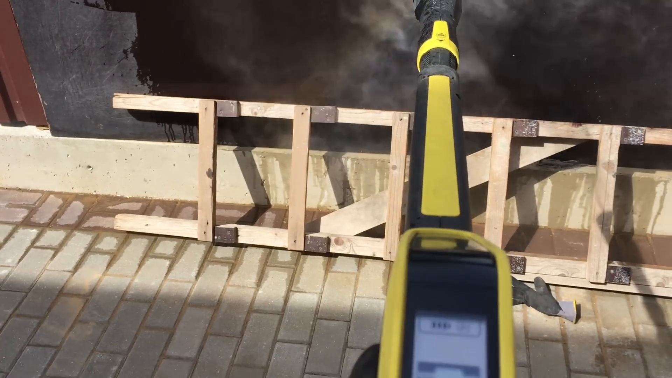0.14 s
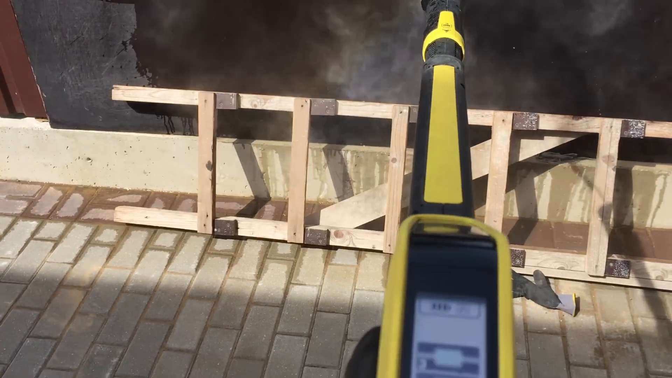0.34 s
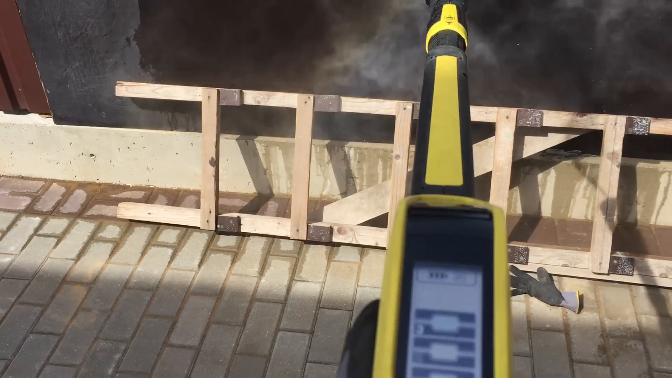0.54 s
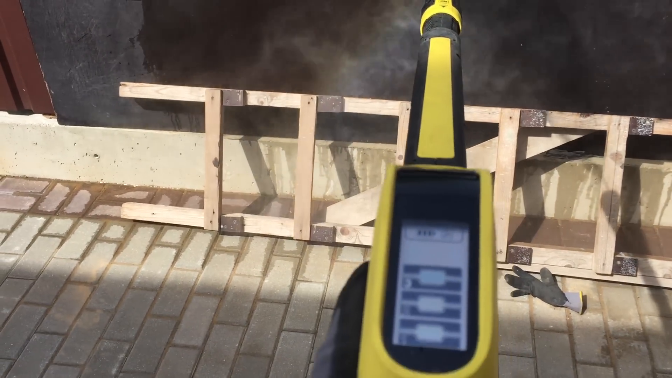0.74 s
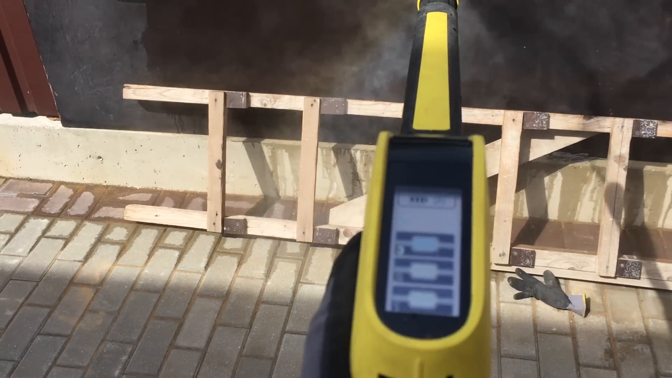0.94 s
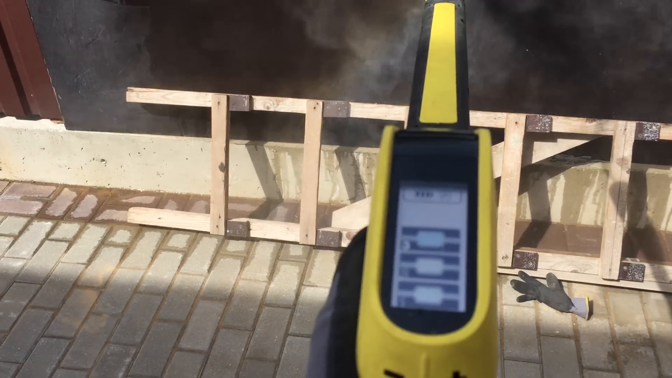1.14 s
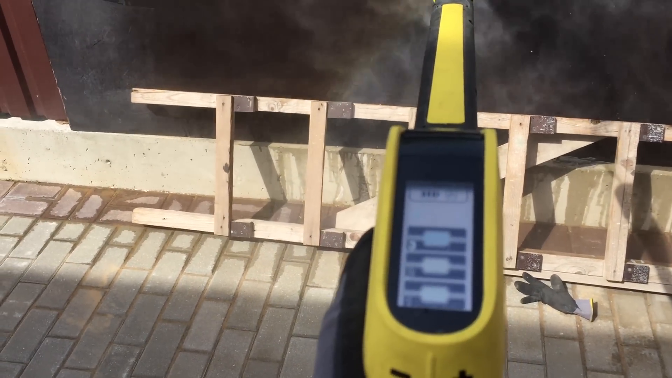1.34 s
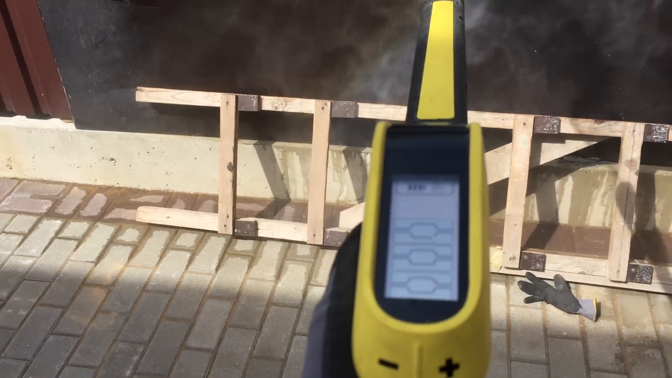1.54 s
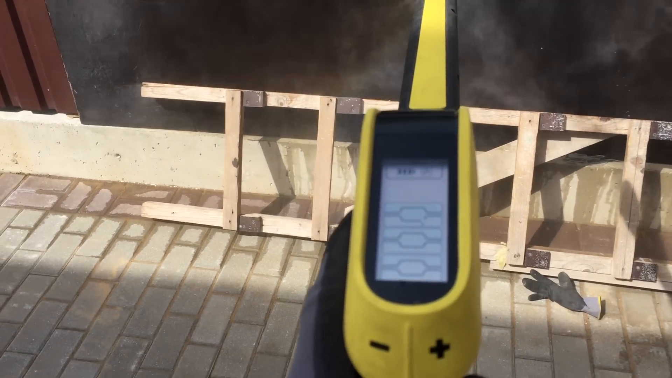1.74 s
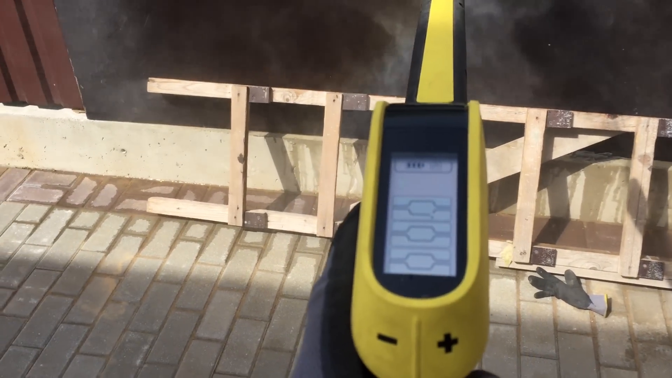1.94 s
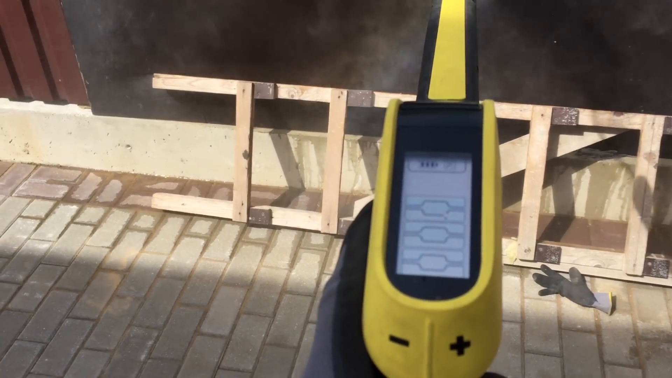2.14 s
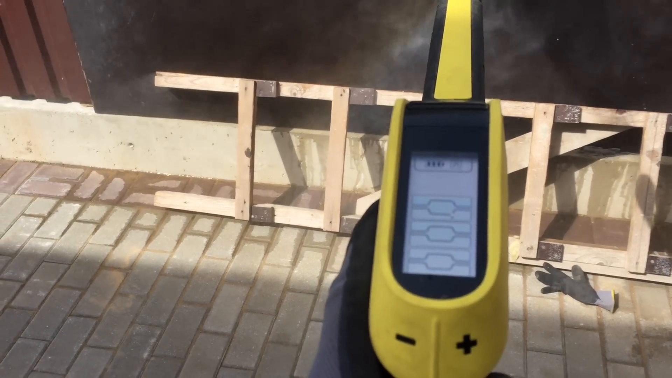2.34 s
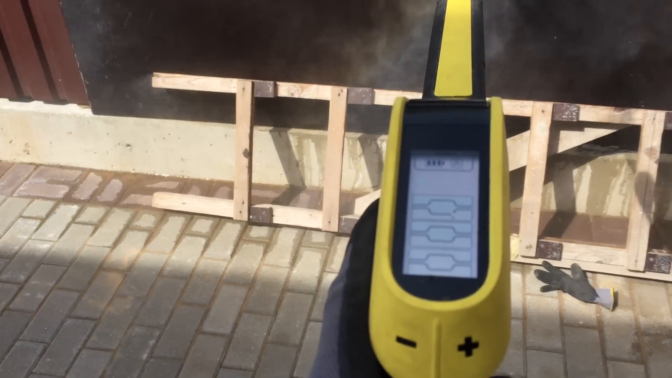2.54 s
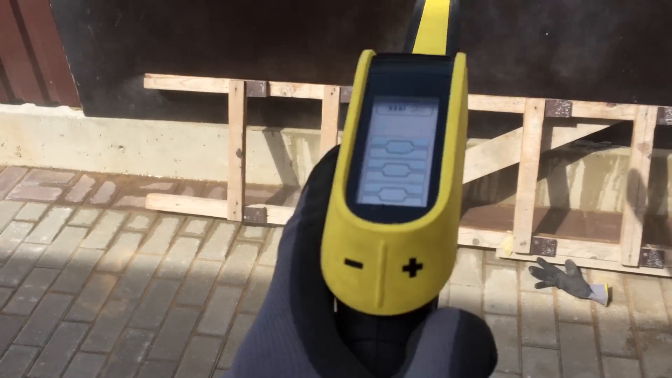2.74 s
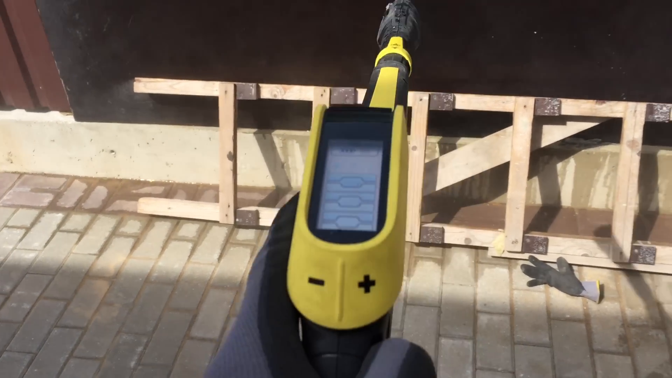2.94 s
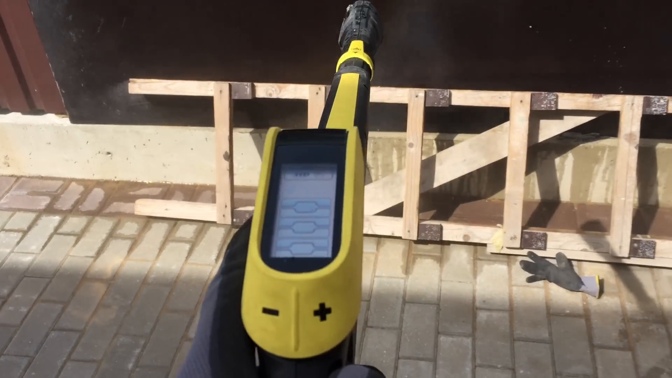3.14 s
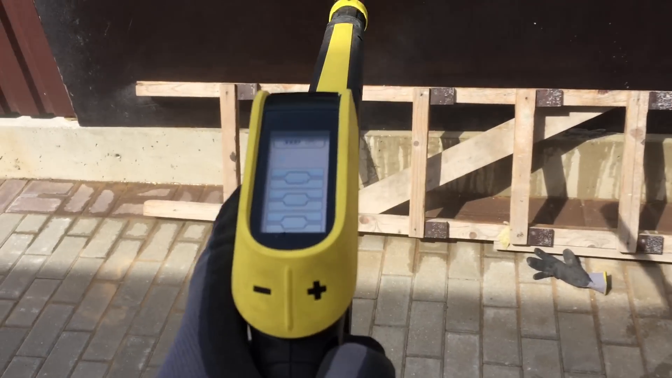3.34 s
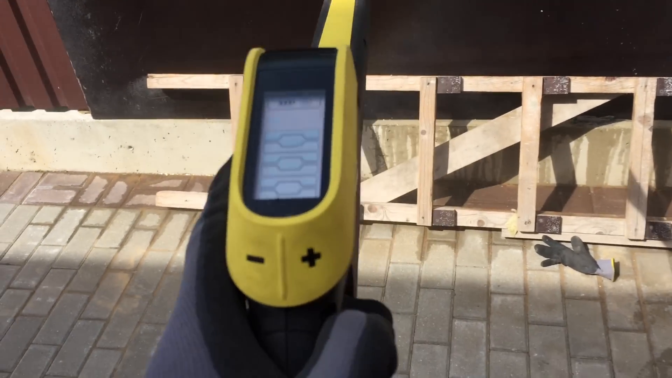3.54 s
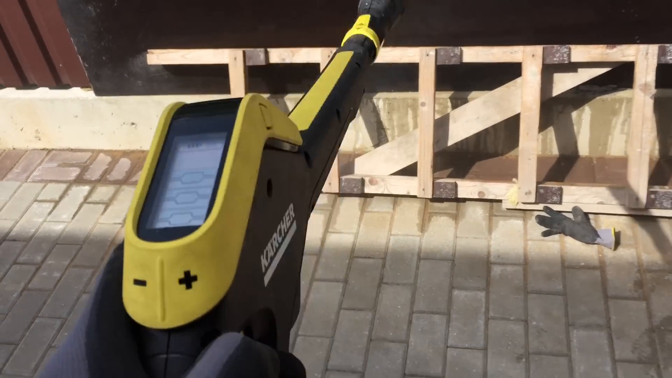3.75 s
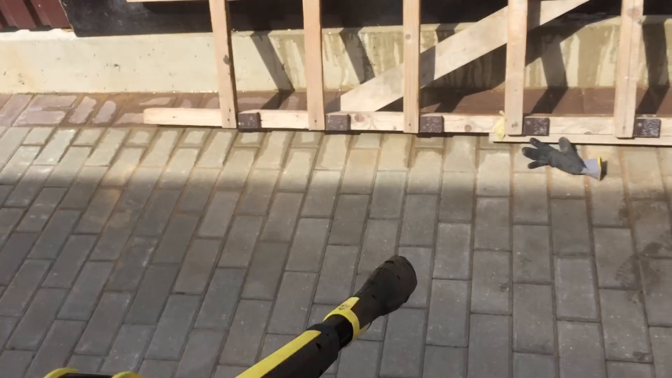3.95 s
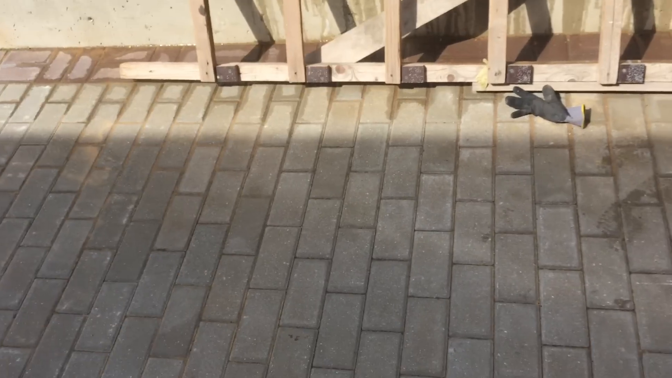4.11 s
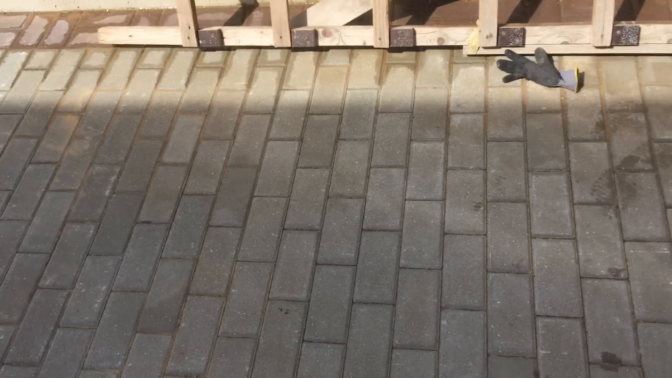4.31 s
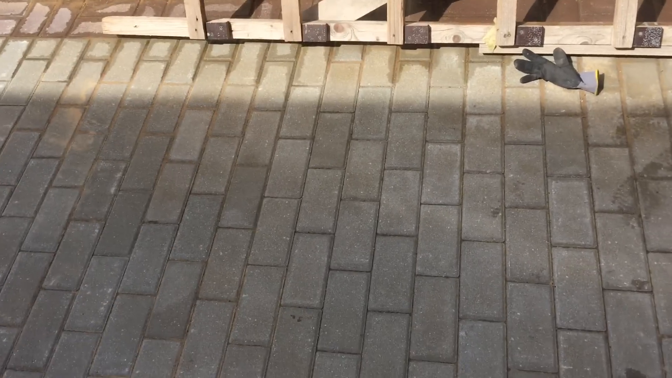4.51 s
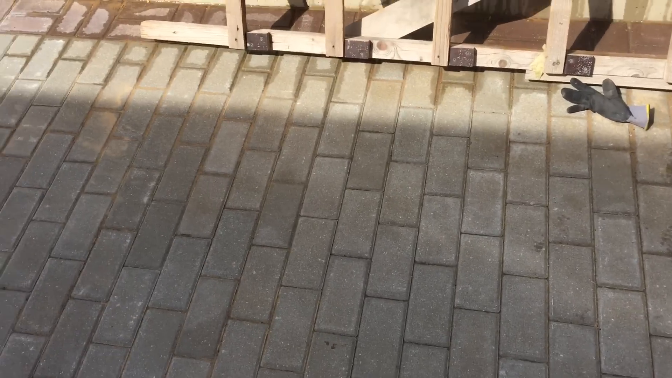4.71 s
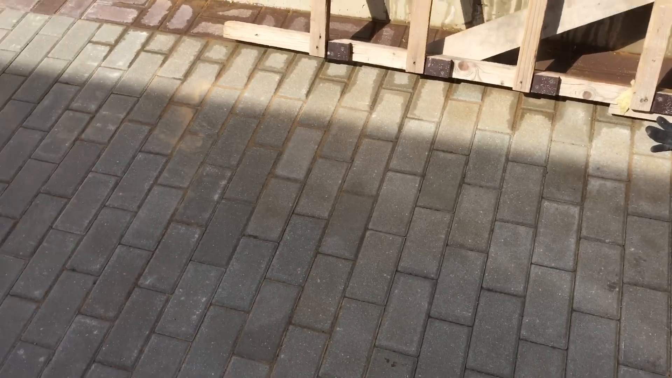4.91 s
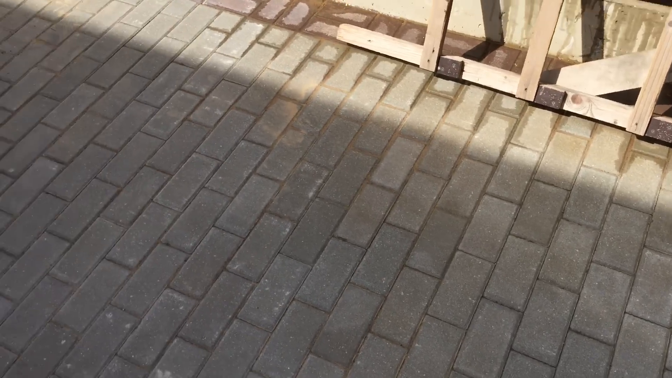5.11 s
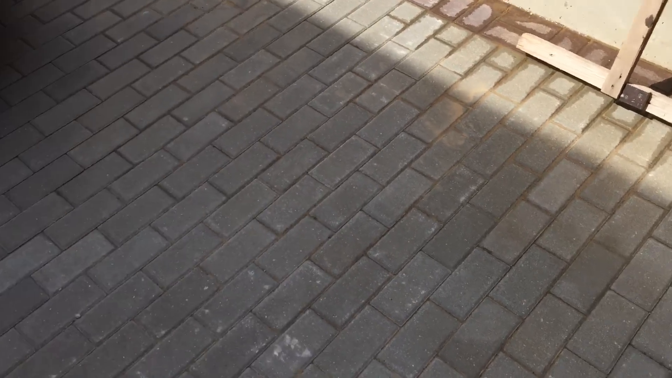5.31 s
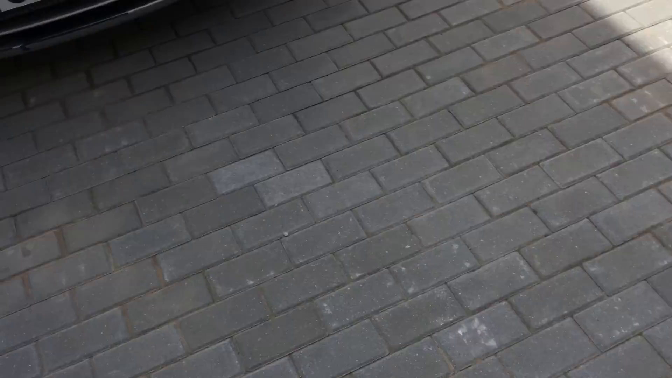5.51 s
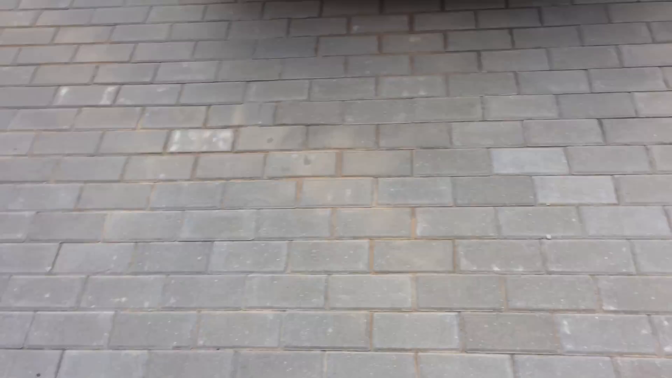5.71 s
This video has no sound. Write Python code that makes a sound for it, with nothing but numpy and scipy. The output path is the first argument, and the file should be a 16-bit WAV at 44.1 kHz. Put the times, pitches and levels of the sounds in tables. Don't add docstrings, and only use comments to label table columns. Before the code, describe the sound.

From 0 to 2.8 s a pressure washer runs close by: a dense, bright, steady jet hiss with water splashing on a wall, a mid-pitched pump whine, low rumble and a hose throb that quickly builds and rises slightly. The jet starts a little weak and soon settles. At 2.8 s the trigger snaps shut with a very loud, hard plastic click and short yard echo; the pump stops within about a tenth of a second. Remaining pressure dribbles and sighs through the hollow lance, thinning out by 3.5 s. Then the yard is very quiet, with faint air and muffled low handling bumps on the camera. Light ticks and taps occur around 3.4 to 4.2 s, soft shoe scuffs, sleeve swishes and hose scraping from 4.1 to 4.9 s. A harder lance knock with tiny bounces lands at 5.2 s, faint taps follow at 5.5 s, and a short, quickly weakening spray burst begins at 5.7 s.

```python
import sys
import numpy as np
from scipy import signal
from scipy.fft import rfft, irfft, next_fast_len
from scipy.io import wavfile
from scipy.ndimage import uniform_filter1d, map_coordinates

SR = 44100
rng = np.random.default_rng(int(sys.argv[2]) if len(sys.argv) > 2 else 0)


def boost(x):
    u = np.asarray(x, float) / 20
    return 10 ** u


def persist_wave(psi):
    counts = np.round(np.clip(psi, -1, 1) * 32767).astype(np.int16)
    wavfile.write(sys.argv[1], SR, np.atleast_2d(counts).T)


N = 254456

SHUT_S, STOP_S, EMPTY_S, AGAIN_S = 2.813, 2.914, 3.415, 5.7


def unit(x):
    return x / np.sqrt(np.mean(x ** 2) + 1e-20)


def along(points, hz):
    f, v = np.transpose(points)
    return np.interp(np.log(hz + 1), np.log(f + 1), v)


def wobble(rate):
    knots = rng.standard_normal(int(N * rate / SR) + 4)
    return map_coordinates(knots, [np.arange(N) * rate / SR])


def filtered(x, response):
    m = next_fast_len(N + 8192)
    return irfft(rfft(x, m) * response(np.fft.rfftfreq(m, 1 / SR)), m)[:N]


def rush(spectrum, patchy_db, grain_db, comb_db=1.68):
    grains = rng.standard_normal(N) * boost(grain_db * wobble(1500))
    z = signal.stft(grains, nperseg=1024)[2]
    patches = uniform_filter1d(rng.standard_normal(z.shape), 4, 0)
    patches = unit(uniform_filter1d(patches, 10, 1))
    comb = rng.standard_normal(len(z))[:, None]
    x = signal.istft(z * boost(patchy_db * patches + comb_db * comb), nperseg=1024)[1][:N]
    return unit(filtered(x, lambda hz: boost(along(spectrum, hz))))


def resonant(modes):
    def shape(f):
        return sum(boost(db) * (f * w) ** 2 / ((c * c - f * f) ** 2 + (f * w) ** 2) for c, w, db in modes)
    return unit(filtered(rng.standard_normal(N), shape))


def since(s):
    return np.maximum(np.arange(N) / SR - s, 0)


def ends(s, t60):
    return boost(-60 * since(s) / t60)


def trickle(db, db_per_s):
    return (since(SHUT_S) > 0) * boost(db + db_per_s * since(SHUT_S)) * ends(EMPTY_S, 0.28)


def shut_fade():
    return np.clip(since(SHUT_S) / 0.053, 0, 1)


def coasting():
    return shut_fade() * ends(STOP_S, 0.11)


def dryness():
    return np.clip(since(2.88) / 0.36, 0, 1)


def flow_level():
    return -2.5 * np.exp(-since(0) / 0.25) + 0.26 * wobble(9)


def shaft_turns():
    order_13_hz = 611.2 + 13.05 * np.exp(-since(0) / 0.3285)
    order_13_hz = order_13_hz - 16 * (1 - np.exp(-since(SHUT_S) / 0.04))
    return 2 * np.pi * np.cumsum(order_13_hz / 13) / SR


# multiple of the shaft speed, level/dB against the 13th, phase wander/rad
PUMP_ORDERS = [(3.01, -15, 0.39), (4.014, -12, .9), (4.98, -12, 1), (6.008, -3.5, 0.75),
               (10.97, -22.5, 0.64), (12.01, -16.5, .3), (12.94, 1, 0.11), (17.07, -19, .4),
               (20.16, -20, 1), (24, -21, 0.19), (29.45, -22, .8)]


def pump_whine(shaft):
    level_db = -28 - 3 * np.exp(-since(0) / 0.074) - 105 * since(SHUT_S)
    orders = sum(boost(db + 0.25 * wobble(14)) * np.sin(multiple * shaft + wander * wobble(15))
                 for multiple, db, wander in PUMP_ORDERS)
    mains_hum = boost(-16 + 2.5 * wobble(23)) * np.sin(2 * np.pi * 100.5 * since(0))
    return np.sqrt(2) * boost(level_db) * ends(STOP_S, 0.11) * (orders + mains_hum)


def hose_throb(shaft):
    t = since(0)
    throb = 2 * np.pi * np.cumsum(58 + 19 * (1 - np.exp(-t / 0.65))) / SR
    slack_db = -27.5 * np.exp(-t / 0.12)
    level = boost(-33.5 + 1.1 * t + slack_db + 0.4 * wobble(4.8)) * ends(SHUT_S, 0.08)
    plain = np.sin(throb + 0.2 * wobble(11))
    with_shaft = boost(-4 + 0.9 * wobble(3.3)) * np.sin(throb + shaft + 0.66 * wobble(11))
    return np.sqrt(2) * level * (plain + with_shaft)


# f/Hz, level/dB per Hz
HISS_COLOUR = [(1760, -23), (3000, -10), (3970, -6.5), (4970, -4.5), (5710, 0), (7720, -3.5), (9010, -1.5),
               (10500, -7), (11300, -4.5), (14200, -5), (15100, -4), (16000, -14)]


def jet_hiss(flow_db):
    jet = rush(HISS_COLOUR, patchy_db=0.45, grain_db=1.0)
    thin = rush(HISS_COLOUR, patchy_db=3.5, grain_db=1.0)
    dull = filtered(thin, lambda hz: 1 / (1 + (hz / 12500) ** 4))
    thin = dull + np.exp(-since(SHUT_S) / 0.4) * (thin - dull)
    mist = boost(-12.5) * shut_fade() * ends(SHUT_S, 0.39)
    return boost(-27 + flow_db) * (ends(SHUT_S, 0.11) + mist) * jet + trickle(-48.5, -15.5) * thin


# f/Hz, level/dB per Hz
SPLASH_COLOUR = [(220, -46.5), (380, -12), (456, -21.5), (548, -15), (604, -11.5), (673, -10),
                 (1310, -12.5), (1530, -10.5), (3990, -15.5), (5000, -23), (6500, -49), (11000, -120)]
# f/Hz, level/dB per Hz
DRIBBLE_COLOUR = [(260, -38.5), (450, -11.5), (603, -6), (832, -15.5), (1420, -11.5), (1570, -17),
                  (2700, -16), (5000, -27.5), (6500, -60), (11000, -120)]


def splash(flow_db):
    shut = shut_fade()
    water = (1 - shut) * rush(SPLASH_COLOUR, patchy_db=0.45, grain_db=1.0)
    water = water + shut * rush(DRIBBLE_COLOUR, patchy_db=1.5, grain_db=0.5)
    level = boost(-25 + 1.2 * flow_db) * ends(SHUT_S, 0.14)
    level = level + boost(-38) * coasting() + trickle(-38, -39.5)
    return level * water


# f/Hz, level/dB per Hz
RUMBLE_COLOUR = [(35, -29.5), (60, -12), (92, -5.5), (166, -4.5), (233, -2.5), (281, -2), (302, -5.5),
                 (330, -3.5), (454, -18), (500, -13), (650, -37), (1100, -120)]
# f/Hz, level/dB per Hz
COAST_COLOUR = [(26, -41), (45, -9.5), (102, -3.5), (151, -14.5), (194, 5), (242, -9.5), (282, 0.5),
                (344, -22), (401, -8.5), (500, -14.5), (650, -40.5), (1100, -120)]


def rumble(flow_db):
    shut = shut_fade()
    shake = (1 - shut) * rush(RUMBLE_COLOUR, patchy_db=2.5, grain_db=2.8)
    shake = shake + shut * rush(COAST_COLOUR, patchy_db=-2.5, grain_db=5.0)
    level = boost(-30 + 1.8 * flow_db) * (1 - shut)
    level = level + boost(-31.5) * coasting() + trickle(-33, -61.5)
    return boost(0.53 * wobble(25)) * level * shake


# f/Hz, level/dB per Hz
YARD_COLOUR = [(60, -42), (150, -19), (280, -21), (460, -27.5), (800, -25.5), (1400, -30.5), (2200, -31),
               (4000, -36.5), (9000, -43), (13000, -46.5), (16000, -45.5)]


def yard_air():
    return boost(-69 + 0.8 * wobble(2.6)) * rush(YARD_COLOUR, patchy_db=2.0, grain_db=0.5)


# centre t/s, peak level/dB, f/Hz, length/cycles
HAND_BUMPS = [(.015, -32, 58, 3), (3.302, -46, 90, 2.2), (3.398, -36.8, 70.3, 3), (3.462, -35, 201, 4),
              (3.527, -44, 59, 3.5), (3.562, -38.5, 97, 4.06), (3.592, -40, 62, 4.14),
              (3.731, -40.2, 112, 3.8), (3.778, -44.5, 77, 3.5), (3.822, -38.5, 80, 3.9),
              (3.899, -44, 92, 5), (3.959, -47.5, 89.5, 3.1), (4.166, -35, 95, 1.6),
              (4.192, -37.5, 108.6, 5), (4.23, -36.5, 81, 4.5), (4.396, -48.8, 72, 2.5),
              (4.485, -44, 85, 4), (4.519, -46, 64.4, 2.8), (4.591, -46, 137, 1.35),
              (4.645, -43.5, 66, 6.1), (4.684, -42, 61, 3.3), (4.742, -37, 72.4, 5), (4.873, -41, 58, 3.9),
              (4.924, -45, 81, 2.3), (5.057, -38, 61, 3), (5.182, -32, 125, 2.9), (5.267, -40, 106, 2.4),
              (5.315, -38, 82, 2.4), (5.344, -36.5, 78.3, 5.2), (5.496, -48.5, 82, 4.4)]


def camera_bumps():
    out = np.zeros(N + 2 * SR)
    for (s, db, hz, cycles), start in zip(HAND_BUMPS, rng.random(len(HAND_BUMPS))):
        t = np.arange(int(SR * cycles / hz)) / SR
        turns = hz * t + start
        shake = np.sin(2 * np.pi * turns)
        shake = shake + 0.14 * np.sin(2 * np.pi * 2.11 * turns)
        first = SR + round(s * SR - len(t) / 2)
        out[first:][:len(t)] += boost(db) * shake * np.hanning(len(t))
    return out[SR:][:N]


# t/s, peak level/dB, f/Hz, t60/s
TRIGGER_RINGS = [
    (2.8012, -8, 1700, .016),
    (2.8046, -0.5, 1400, .02),
    (2.8048, -9, 4500, .016),
    (2.8076, -5, 1300, .012),
    (2.8048, -14, 463, .025),
    (2.8216, -12, 1400, .014),
]


def trigger_snap():
    out, t = np.zeros(N + SR), np.arange(SR // 4) / SR
    rise = 1 - np.exp(-t / 0.0003)
    for s, db, hz, t60 in TRIGGER_RINGS:
        out[round(s * SR):][:len(t)] += boost(db - 60 * t / t60) * rise * np.sin(2 * np.pi * hz * t)
    return out[:N]


# f/Hz, t60/s
WALL_DECAY = [(200, 0.38), (2000, .25), (12000, 0.37)]


def walls(x):
    hz, t, z = signal.stft(rng.standard_normal(SR // 3), SR, nperseg=256)
    decay = boost(-60 * t / along(WALL_DECAY, hz)[:, None])
    tail = signal.istft(z * decay, SR, nperseg=256)[1]
    return signal.fftconvolve(np.pad(x, (200, 0)), tail / np.linalg.norm(tail))[:N]


def puffs(rows):
    out, t = np.zeros(N + SR), np.arange(SR // 4) / SR
    for s, db, hz, sharp, t60 in rows:
        band = signal.iirpeak(hz, sharp, SR)
        once = signal.lfilter(*band, rng.standard_normal(len(t)))
        puff = unit(signal.lfilter(*band, once))
        rise = 1 - np.exp(-t * hz / 0.51)
        out[round(s * SR):][:len(t)] += boost(db - 60 * t / t60) * rise * puff
    return out[:N]


# t/s, peak level/dB, f/Hz
GRIT_TICKS = [(2.8064, -12.5, 6010), (3.7225, -53, 1000), (3.974, -58, 3810), (4.038, -66, 6450),
              (4.062, -61, 3500), (4.191, -46, 4480), (4.44, -45, 3500), (4.661, -53, 10640),
              (4.958, -67, 13530), (5.45, -69, 8000), (5.458, -67, 7200)]


def ticks():
    return puffs([(*row, 1.2, 0.014) for row in GRIT_TICKS])


# t/s, level/dB
GRIP_LEVEL = [(2.93, -53), (3.05, -54), (3.2, -73), (3.62, -57), (3.85, -53), (4.1, -61.5), (4.7, -60.5),
              (5.2, -50), (5.56, -68)]


def grip_tremor():
    s, db = np.transpose(GRIP_LEVEL)
    level_db = np.interp(np.arange(N) / SR, s, db) - 6 + 5.5 * wobble(15)
    return (since(SHUT_S) > 0) * boost(level_db) * resonant([(69.6, 74, 8.5), (150, 82, -13.0)])


# f/Hz, width/Hz, level/dB
LANCE_TUBE = [(656, 100, 7.5), (1050, 260, -1.5), (1480, 120, 1), (2140, 300, 2), (3620, 260, -12.5)]
# f/Hz, width/Hz, level/dB
NOZZLE_END = [(5000, 330, -4), (5600, 410, 1), (6330, 260, 0.5), (6860, 300, -3), (7520, 250, -9.5),
              (8770, 400, -5), (9400, 290, -2), (11400, 500, -9.5), (12370, 590, -10.5),
              (13300, 600, -16.5), (15040, 1500, -14)]


def lance_breath():
    tube = trickle(-34, -49.5) * boost(1.5 * wobble(27)) * resonant(LANCE_TUBE)
    nozzle = trickle(-42.5, -32) * boost(1.0 * wobble(30)) * resonant(NOZZLE_END)
    return dryness() * (tube + nozzle)


# t/s, peak level/dB, f/Hz
LANCE_TAPS = [(2.902, -33, 600), (2.898, -30, 190), (3.439, -47, 650), (3.449, -51, 905),
              (3.452, -53.5, 1600), (3.447, -34, 150), (3.45, -45, 330), (3.474, -38, 220),
              (3.723, -58, 990), (3.722, -50.5, 189), (4.19, -59, 1050), (4.8, -53, 680),
              (5.032, -37.5, 170), (5.539, -49, 1169), (5.539, -60, 1900), (5.546, -55, 2100),
              (5.701, -44, 150)]


def taps():
    return puffs([(*row, 1.8, 0.065) for row in LANCE_TAPS])


# f/Hz, level/dB per Hz
SCUFF_COLOUR = [(290, -50), (500, -22.5), (637, -12), (840, -3.5), (1280, -3), (1590, -3.5), (1990, -8.5),
                (2680, -1), (4450, -11), (7000, -32), (9100, -46), (15400, -120)]
# f/Hz, level/dB per Hz
SWISH_COLOUR = [(1180, -37), (2000, -2.5), (3200, -10.5), (3460, -1.5), (5070, -7.5), (5780, -3),
                (15100, -13.5), (16000, -14.5)]
# centre t/s, length/s, scuff level/dB, swish level/dB
RUB_STROKES = [
    (4.07, 0.023, -70, -73),
    (4.18, 0.11, -63.5, -60.5),
    (4.32, 0.12, -58, -61.5),
    (4.415, .13, -52.5, -57),
    (4.567, .16, -72.5, -88),
    (4.678, 0.054, -65, -62.5),
    (4.81, .085, -60, -51.5),
]


def shoes_and_sleeve():
    def swell(s, length):
        return boost(-9.5 * np.abs(2 * (since(0) - s) / length) ** 2.4)
    scuff_gain = sum(boost(db) * swell(s, length) for s, length, db, _ in RUB_STROKES)
    swish_gain = sum(boost(db) * swell(s, length) for s, length, _, db in RUB_STROKES)
    scuff = scuff_gain * rush(SCUFF_COLOUR, patchy_db=2.0, grain_db=1.5)
    return scuff + swish_gain * rush(SWISH_COLOUR, patchy_db=2.5, grain_db=2.5)


# start t/s, end t/s, f/Hz, width/Hz, level/dB
HOSE_DRAGS = [
    (4.264, 4.44, 2600, 500, -55),
    (4.32, 4.479, 1940, 1002, -53.5),
    (4.41, 4.489, 860, 200, -60),
    (4.46, 4.62, 2550, 299, -70),
    (4.595, 4.8, 2500, 301, -65),
    (4.64, 4.74, 530, 90, -61),
]


def hose_drag():
    def stroke(a, b):
        return np.sin(np.pi * np.clip((since(0) - a) / (b - a), 0, 1))
    return sum(boost(db) * stroke(a, b) * resonant([(hz, width, 0)]) for a, b, hz, width, db in HOSE_DRAGS)


# peak level/dB, f/Hz, sharpness, t60/s
CLACK_BANDS = [(-26.5, 670, 0.97, 0.023), (-31, 230, 0.63, 0.059), (-29.5, 5990, 0.99, .018),
               (-42.5, 1770, .7, 0.22), (-53, 7220, .67, .12)]


def lance_clack():
    hit_s = 5.192
    hit = [(hit_s, *row) for row in CLACK_BANDS]
    bounces = [(hit_s + delay, db, 2744, 0.45, 0.018) for delay, db in [(0.01, -37), (0.017, -43.5)]]
    return puffs(hit + bounces)


# f/Hz, level/dB per Hz
NEW_SPRAY_COLOUR = [(180, -40), (300, -15.5), (502, -23), (688, -8), (882, -9), (1040, -3), (1710, -9),
                    (1830, -6), (3320, -1.5), (4120, -3), (4950, -8.5), (6140, -7), (15800, -17.5)]


def new_burst():
    t = since(AGAIN_S)
    level = (1 - np.exp(-t / 0.003)) * boost(-34 - 61.5 * t) * ends(AGAIN_S + 0.05, 0.2)
    return level * rush(NEW_SPRAY_COLOUR, patchy_db=1.0, grain_db=1.0)


def scene():
    shaft, flow_db = shaft_turns(), flow_level()
    machine = pump_whine(shaft) + hose_throb(shaft)
    water = (1 - 0.33 * dryness()) * (jet_hiss(flow_db) + splash(flow_db)) + rumble(flow_db)
    camera = camera_bumps() + grip_tremor()
    camera = filtered(camera, lambda f: f ** 4 / (f ** 4 + 22.0 ** 4))
    hits = trigger_snap() + ticks() + taps() + lance_clack()
    rubbing = shoes_and_sleeve() + hose_drag()
    mono = machine + water + yard_air() + camera + hits + boost(-17.0) * walls(hits)
    mono = mono + lance_breath() + rubbing + new_burst()
    return np.array([mono, mono])


def band_limit(x):
    return signal.sosfilt(signal.butter(12, 17000, fs=SR, output="sos"), x)


WIDE_MOMENTS = [.12, .3, .61, .63, .75, .79, .86, 1.58, 1.93, 2.07]


def record(dry):
    clipped = dry[0] / (1 + np.abs(dry[0] / 0.7) ** 8) ** (1 / 8)
    mono = filtered(clipped, lambda hz: hz < 15830)
    other = np.roll(mono, 5000)
    t = np.arange(N) / SR
    side = np.zeros(N)
    for s in WIDE_MOMENTS:
        low = rng.uniform(4100, 14000, (2, 1))
        bands = filtered(other, lambda hz: ((hz > low) & (hz < low + 1900)).any(axis=0))
        side += np.cos(np.pi / 2 * np.clip((t - s) * SR / 1024, -1, 1)) * bands
    side *= boost(-5.5)
    return band_limit(np.array([mono + side, mono - side]))


dry = scene()
out = record(dry)
persist_wave(out)
```